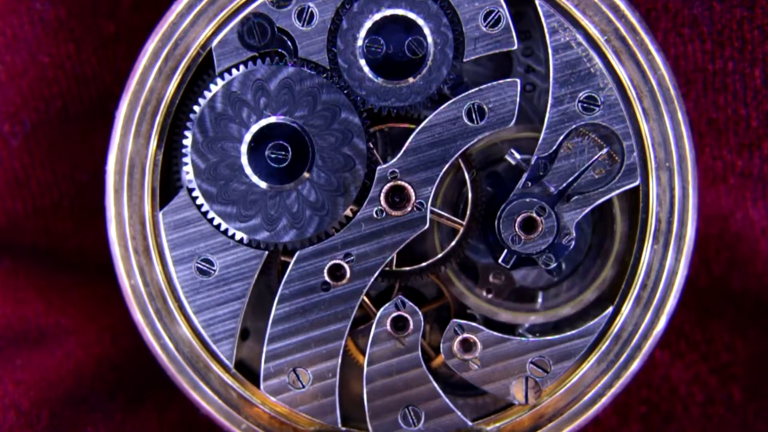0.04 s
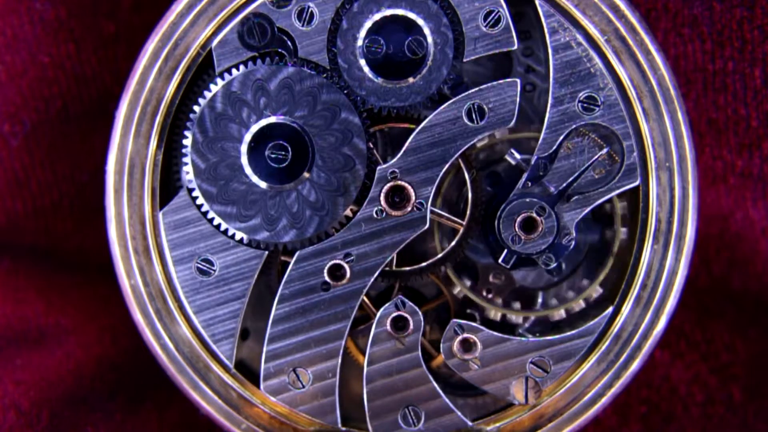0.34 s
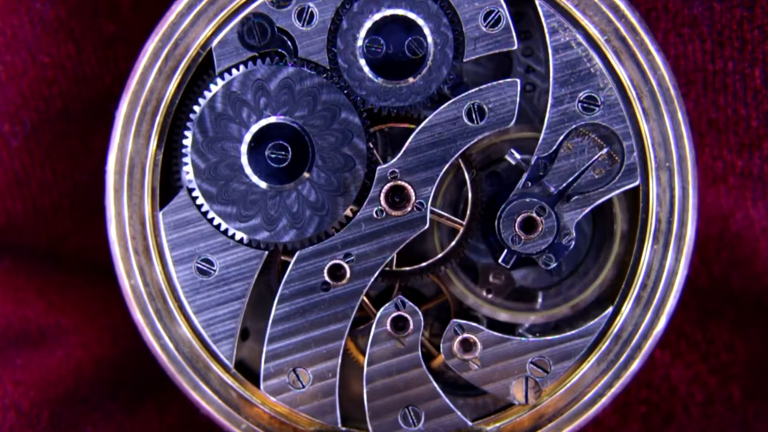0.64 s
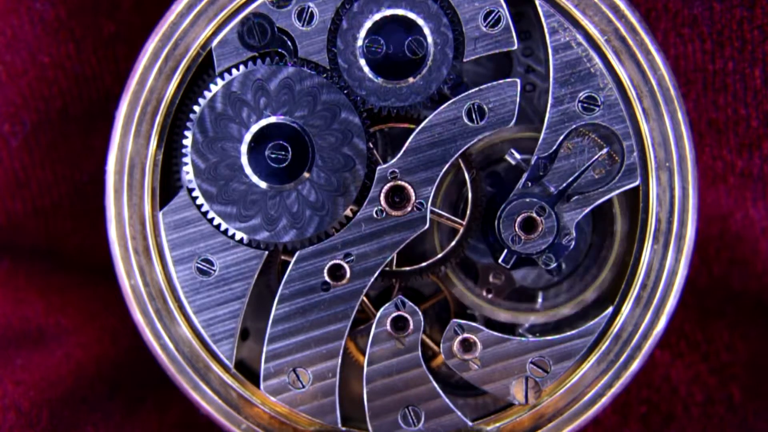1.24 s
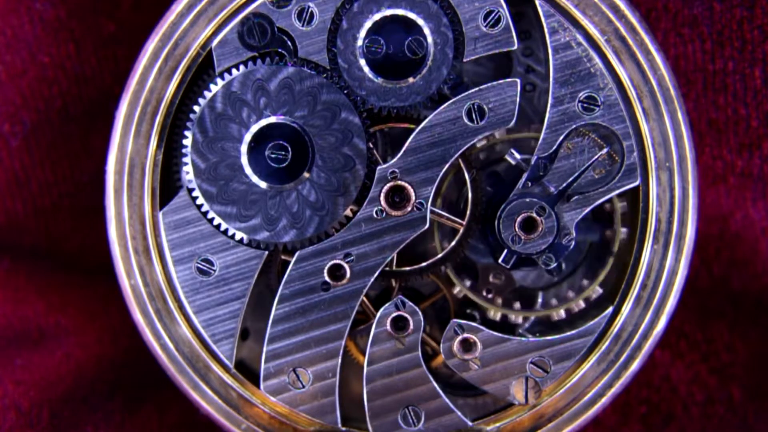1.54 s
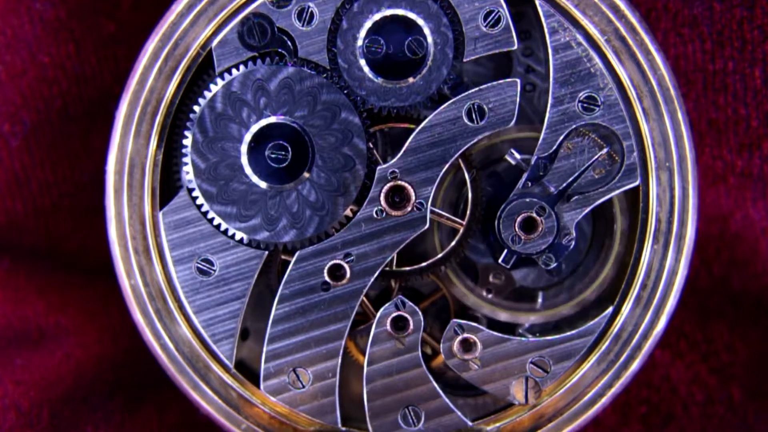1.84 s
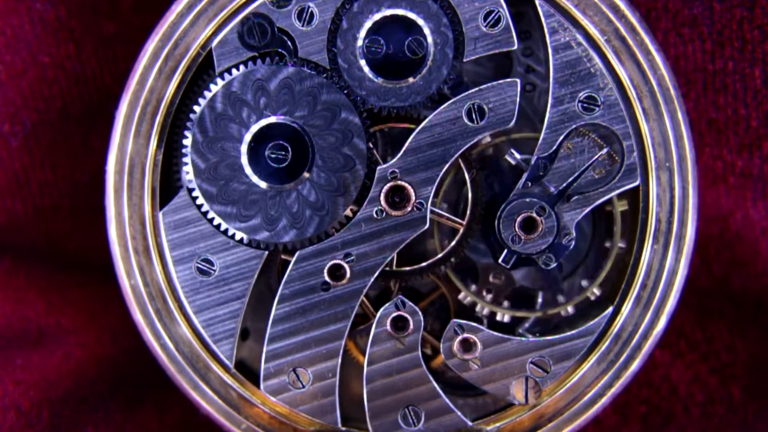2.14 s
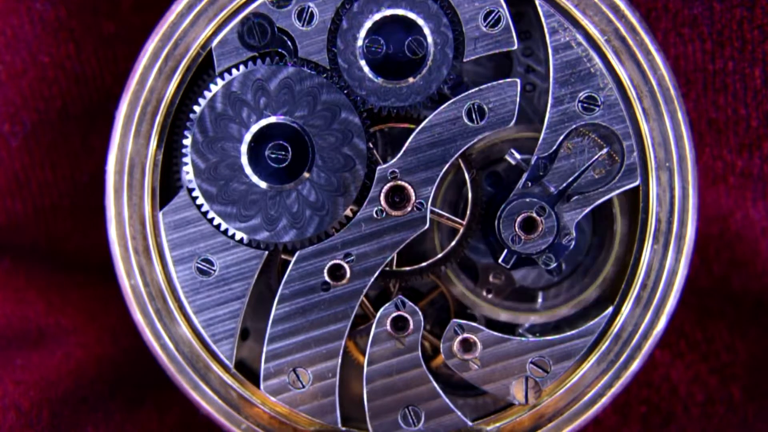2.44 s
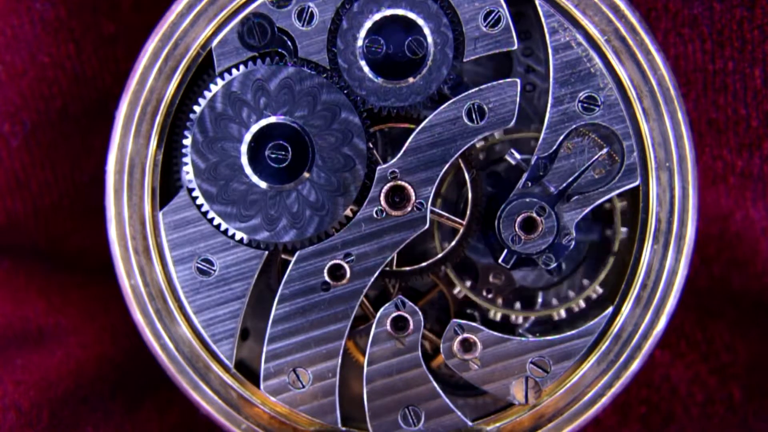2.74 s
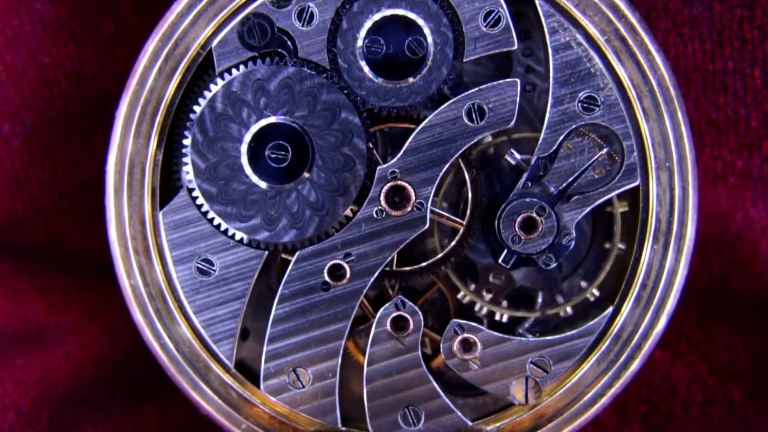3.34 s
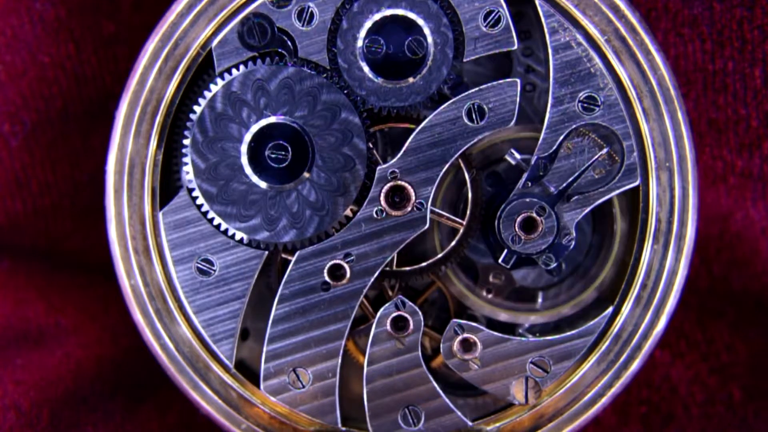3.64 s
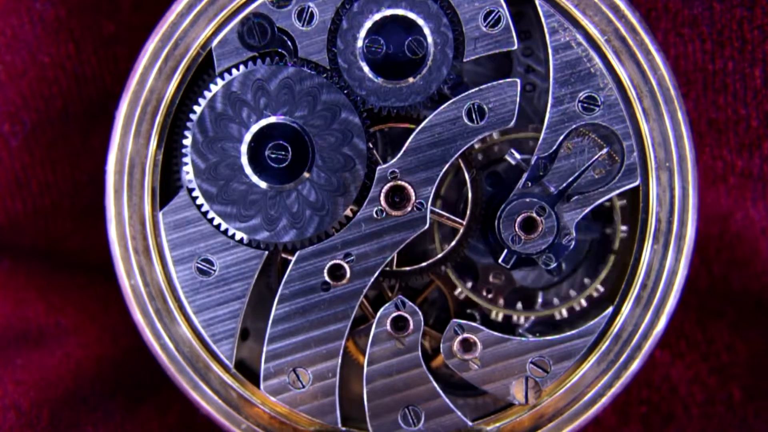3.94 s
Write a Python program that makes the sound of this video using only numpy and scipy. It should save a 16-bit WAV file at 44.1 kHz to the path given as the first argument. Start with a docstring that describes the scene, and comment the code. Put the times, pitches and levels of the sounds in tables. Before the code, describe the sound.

A pocket watch ticks quickly and evenly, close up, over a faint hum.

```python
"""An open pocket watch ticks five times a second, close up, over mains hum and faint room noise.
Each beat is a quick run of escapement contacts (unlocking, impulse, drop, rebound) that shake the
plates and leave small steel parts ringing. In the first second the table takes a few soft, low bumps.
Near 1.4 s cloth brushes once, and from 3.1 s something hollow rattles farther off in dull knocks."""
import sys
import numpy as np
from scipy import signal
from scipy.fft import rfft, irfft
from scipy.io import wavfile
from scipy.ndimage import uniform_filter1d

SR = 44100
rng = np.random.default_rng(int(sys.argv[2]) if len(sys.argv) > 2 else 0)


def store_wav(level_fs):
    """Save 16-bit WAV to argv[1]."""
    pcm = np.round(np.clip(np.atleast_2d(level_fs), -1, 1) * 32767)
    wavfile.write(sys.argv[1], SR, pcm.T.astype(np.int16))


N = 176400
BASS_PAN_DB = 0.5  # rumble and bumps lean slightly left


def watch():
    """Two pallets take turns, tick and tock, driving the same plates and springs with different weights."""
    # Damped resonances of plates and case: centres in Hz.
    plate_hz = [1520, 2980, 3850, 4590, 4980, 5650, 7200, 7850, 8500, 9700, 10750, 11830, 13100, 14300,
                15350]
    # Their shapes. Each row: width in Hz, tick level in dB, tock level in dB.
    plate_modes = [(206, -26, -25.5), (259, -23.5, -23.5), (426, -17.5, -16.5), (139, -10, -7),
                   (149, -8, -8.5), (490, -14, -14), (450, -9, -9.5), (342, -9.5, -7.5), (420, -10.5, -6.5),
                   (370, -4.5, -4), (574, -8, -6), (350, -3.5, -2), (706, -5.5, -5), (400, 3.5, 0.5),
                   (458, -4, -5)]
    # Long rings of springs and wheels: pitches in Hz.
    ring_hz = [2930, 3789, 4245, 4963, 5577, 7073, 8260, 8680, 9067, 9675, 9948, 10669, 11140, 11242, 11316,
               13415, 14211, 14900]
    # Their tails. Each row: time to fall 60 dB in seconds, tick level in dB, tock level in dB.
    ring_modes = [(.14, -26, -22), (.14, -17, -23), (.24, -18, -11), (.11, -15, -11), (.15, -19, -18),
                  (.14, -13, -23), (.13, -18, -15), (.13, 0, 4), (.17, -6, -3), (.12, -14, -13),
                  (.14, -11, -13), (.13, -13, -10), (.09, -8, -7), (.08, -9, -9), (.12, -10, -7),
                  (.12, -9, -7), (.12, -5, -9), (.15, -6, -12)]
    plates, rings = np.zeros((2, N))
    for pallet in range(2):
        force, top_force, blow = escapement(pallet)
        for k, (hz, (width, *levels_db)) in enumerate(zip(plate_hz, plate_modes)):
            drive = top_force if hz > 14000 else force
            plates += (-1) ** k * undb(levels_db[pallet]) * resonate(drive, hz, width)
        for hz, (t60, *levels_db) in zip(ring_hz, ring_modes):
            rings += undb(levels_db[pallet]) * ring(blow + undb(-6) * force, hz, t60)
    ticking = undb(7.5) * plates + undb(-41.5) * rings
    return pan(-2.5) * ticking + undb(-10.5) * room(ticking, t60=.06)


def escapement(pallet):
    """One pallet's beats: scraping force, that force as the top resonances feel it, and the drop's blow."""
    # Beats, tick and tock in turn. Each row: time of the drop in seconds, level in dB,
    # lead-in boost in dB, boost of the top resonances after the lead-in in dB.
    beats = [(0.057, -1.5, 5, -3), (0.2569, -1, 0.9, -4), (0.4563, 0.5, 2, 6), (0.657, -0.3, 2, -4),
             (0.8562, 0.1, 0.5, -7), (1.0558, 0.1, 1.3, -3.4), (1.256, -4.3, 6.5, 0), (1.4562, -1, 1, -0.1),
             (1.6551, -1.5, 2.5, 0.4), (1.8556, -0.4, 1.5, 0), (2.056, -2.5, 5.5, 3.5),
             (2.2557, -0.5, 3.4, -4), (2.4551, -1.8, 5.5, 0), (2.6549, -0.5, 1.7, -4.0),
             (2.8549, -1.9, 6.5, 4), (3.054, 0.5, 0.3, -2), (3.2544, -0.1, 0.3, -0.5),
             (3.4549, -0.3, 0.2, -2.4), (3.654, 0.8, 0.5, -1), (3.8546, -1.7, 2.5, 1.0)]
    # Contacts in a beat: first slide, unlocking, two impulses, slide off, two drops, two rebounds.
    # Each row: scrape time in seconds, (offset from the drop in seconds, level in dB) for tick, then tock.
    contacts = [(0.0067, (-0.015, -25), (-0.014, -22)), (0.00094, (-0.012, -12.5), (-.0138, -14.5)),
                (0.0042, (-.0117, -15), (-.0118, -11.5)), (.0035, (-0.0087, -21), (-.0078, -13)),
                (0.0028, (-0.0043, -16.5), (-0.0061, -14)), (0.0019, (-.0003, -6), (.0001, -2.3)),
                (0.0025, (.0013, -3.5), (.0017, -6.5)), (0.002, (.004, -10), (0.0046, -10.5)),
                (0.0039, (0.011, -24), (0.0066, -16.5))]
    lead_top_db = -0.5 if pallet else -8  # the tock has the brighter lead-in
    scatter_db, jitter_s = 1.5, .0003
    force, top_force, blow = np.zeros((3, N))
    for drop_s, beat_db, lead_db, top_db in beats[pallet::2]:
        add(blow, undb([beat_db]), drop_s)
        for length_s, *tick_tock in contacts:
            offset_s, contact_db = tick_tock[pallet]
            lead_in = offset_s < -.002
            loose = abs(offset_s) > .002  # contacts away from the drop vary in level and timing
            db = beat_db + contact_db + lead_in * lead_db + loose * scatter_db * rng.standard_normal()
            start_s = drop_s + offset_s + loose * jitter_s * rng.standard_normal()
            contact = undb(db) * scrape(length_s)
            add(force, contact, start_s)
            add(top_force, contact * undb(lead_top_db if lead_in else top_db), start_s)
    return force, top_force, blow


def scrape(length_s):
    """One contact: a dying cluster of microscopic impacts with unit energy."""
    grains_per_s, spread_db = 14000, 2.5
    t = np.arange(1024) / SR
    hits = rng.random(len(t)) < grains_per_s / SR
    hits[0] = True
    grains = hits * rng.choice([-1, 1], len(t)) * undb(spread_db * rng.standard_normal(len(t)))
    force = grains * np.exp(-(t / length_s) ** 2)
    return force / np.linalg.norm(force)


def knocks():
    """Soft blows on something hollow, each with a little clatter, heard through the room."""
    # Distant knocks. Each row: start in seconds, pitch in Hz, level in dB, decay in seconds,
    # clatter against the tone in dB.
    blows = [(3.113, 730, -53.5, 0.0087, 3.5), (3.633, 649, -31, 0.0085, -14.5),
             (3.658, 738, -39, .014, -10), (3.686, 673, -44, 0.013, -8), (3.705, 672, -39.5, .011, -12),
             (3.727, 704, -48.5, 0.016, -6), (3.908, 619, -50.5, 0.034, -8),
             (3.970, 650, -46.5, 0.018, -16)]
    # Resonances that colour the clatter. Each row: centre in Hz, width in Hz, level in dB.
    body = [(520, 150, 1), (824, 280, 0.5), (1610, 360, -9)]
    rise_s = .00485
    t, out = np.arange(SR // 4) / SR, np.zeros(N)
    for start_s, hz, db, decay_s, clatter_db in blows:
        envelope = np.minimum(t / rise_s, 1) * np.exp(-np.maximum(t - rise_s, 0) / decay_s)
        clatter = np.zeros(len(t))
        for centre, width, band_db in body:
            band = resonate(rng.standard_normal(len(t)), centre, width)
            clatter += undb(band_db) * resonate(band, centre, width)
        knock = np.sin(2 * np.pi * hz * t) + undb(clatter_db) * clatter / clatter.std()
        add(out, undb(db) * envelope * knock, start_s)
    return pan(-2.7) * out + undb(-12) * room(out, t60=.36)


def bumps():
    """Brief low swings of the table."""
    # Soft bumps. Each row: centre time in seconds, pitch in Hz, level in dB, half-length in seconds.
    swings = [(.008, 75, -46, 0.016), (.109, 62.6, -38.5, 0.01), (.157, 78, -45, 0.013),
              (.723, 78.7, -35.5, 0.0063)]
    out = np.zeros(N)
    for centre_s, hz, db, half_s in swings:
        t = np.arange(N) / SR - centre_s
        out += undb(db) * np.exp(-(t / half_s) ** 2) * np.sin(2 * np.pi * hz * t)
    return pan(BASS_PAN_DB) * out


def rustle():
    """Cloth brushes once, unevenly, and dies away."""
    # Noise bands of the cloth. Each row: centre in Hz, width in Hz, level in dB.
    bands = [(3200, 600, -2), (5200, 1600, 0), (7000, 1200, -6)]
    start_s, rise_s, decay_s, patchy_db = 1.372, .004, .06, 3.5
    age = np.maximum(np.arange(N) / SR - start_s, 0)
    envelope = np.minimum(age / rise_s, 1) * np.exp(-age / decay_s) * undb(patchy_db * walk(170))
    friction = sum(undb(db) * resonate(rng.standard_normal(N), hz, width) for hz, width, db in bands)
    return undb(-49) * envelope * friction


def hum():
    """Mains hum and a fan's tones, wavering slightly in pitch and level."""
    # The tones: pitches in Hz.
    pitches = [120, 363, 585, 652, 780]
    # Their mix. Each row: level in dB, left minus right in dB.
    mix = [(-59, 4), (-74.5, -2), (-64.5, -2.5), (-74, 1), (-72.5, -5.5)]
    lowest_drift_hz, waver_db = .91, .74
    out = np.zeros((2, N))
    for hz, (db, pan_db) in zip(pitches, mix):
        drift_hz = lowest_drift_hz * np.sqrt(hz / pitches[0]) * walk(7)
        phase = 2 * np.pi * np.cumsum(hz + drift_hz) / SR
        out += pan(pan_db) * np.sqrt(2) * undb(db + waver_db * walk(4.84)) * np.sin(phase)
    return out


def air():
    """Room noise: a rumble shared by both sides under a wide hiss."""
    # Room tone. Each row: frequency in Hz, relative level in dB, likeness of left and right from 0 to 1.
    spectrum = [(20, -2, 0.88), (43, -5.5, 0.85), (92, -9, 0.98), (143, -13, 0.75), (213, -12, 0.67),
                (454, -15.5, 0.58), (675, -13.5, .8), (987, -21, 0.29), (2000, -23.5, .1), (4500, -24, 0.1),
                (9100, -25, 0), (15500, -25, 0.073)]
    hz, db, alike = np.array(spectrum).T
    f = np.maximum(np.arange(N // 2 + 1) * SR / N, 1)
    gain = undb(np.interp(np.log(f), np.log(hz), db) - 30) * (f < 15800)
    likeness = np.interp(np.log(f), np.log(hz), alike)
    mid, side = rfft(rng.standard_normal((2, N)))
    stereo = mid * np.sqrt((1 + likeness) / 2) + np.array([[1], [-1]]) * side * np.sqrt((1 - likeness) / 2)
    bass_lean = pan(BASS_PAN_DB) ** (1 / (1 + (f / 250) ** 2))
    return irfft(gain * stereo * bass_lean, N)


def room(x, t60):
    """Diffuse reflections, different on each side."""
    t = np.arange(SR // 2) / SR
    tail = rng.standard_normal((2, len(t))) * np.exp(-np.log(1000) * t / t60) * (t > .002)
    tail /= np.sqrt(np.sum(tail ** 2, axis=1, keepdims=True))
    return signal.fftconvolve(x[None], tail, axes=1)[:, :N]


def resonate(x, hz, width):
    """A damped resonance with gain 1 at its centre."""
    return signal.lfilter(*signal.iirpeak(hz, hz / width, fs=SR), x + 1e-18)


def ring(x, hz, t60):
    """A freely decaying mode."""
    pole = np.exp((2j * np.pi * hz - np.log(1000) / t60) / SR)
    return signal.lfilter([1], [1, -pole], x + 1e-18).imag


def walk(rate_hz):
    """Smooth random wander with a spread near 1."""
    hold = int(SR / rate_hz)
    steps = np.repeat(rng.standard_normal(N // hold + 1), hold)
    return uniform_filter1d(uniform_filter1d(steps, hold), hold)[:N]


def undb(db):
    """Decibels to gain."""
    return 10 ** (np.asarray(db) / 20)


def pan(db):
    """Stereo gains for a left-minus-right level difference."""
    return undb(np.array([[db], [-db]]) / 2)


def add(out, x, start_s):
    """Mix x into out from a given time."""
    i = max(int(start_s * SR), 0)
    out[i:i + len(x)] += x[:max(len(out) - i, 0)]


def scene():
    """The watch in front of the quiet room."""
    return watch() + hum() + air() + bumps() + knocks() + rustle()


def record(dry):
    """A steep low-pass takes off the top of the treble."""
    return signal.sosfilt(signal.ellip(10, .2, 80, 16400, fs=SR, output="sos"), dry)


dry = scene()
out = record(dry)
store_wav(out)
```